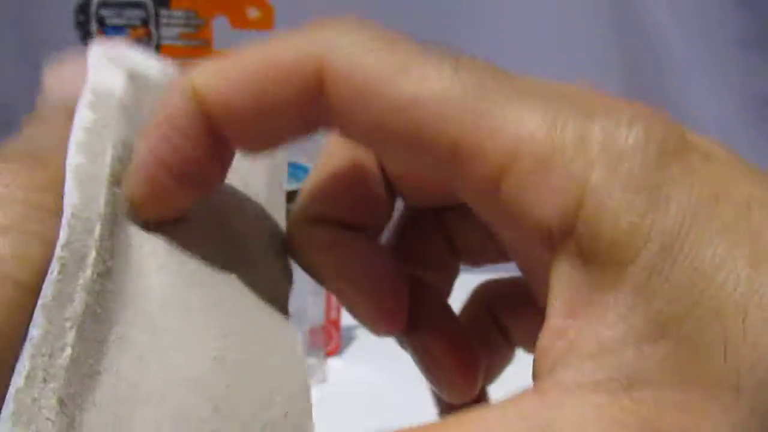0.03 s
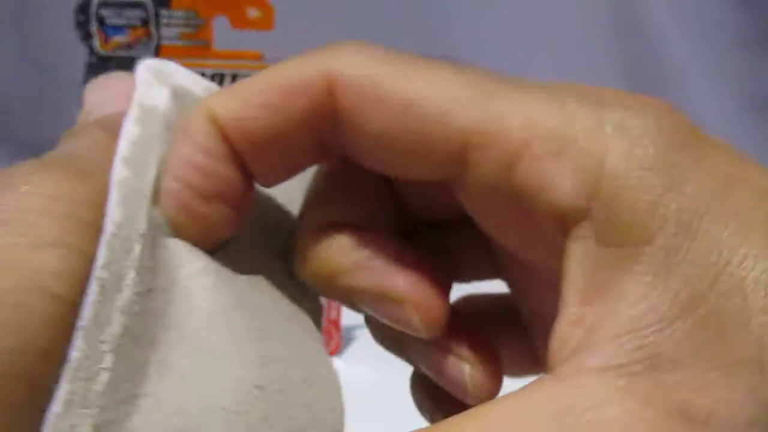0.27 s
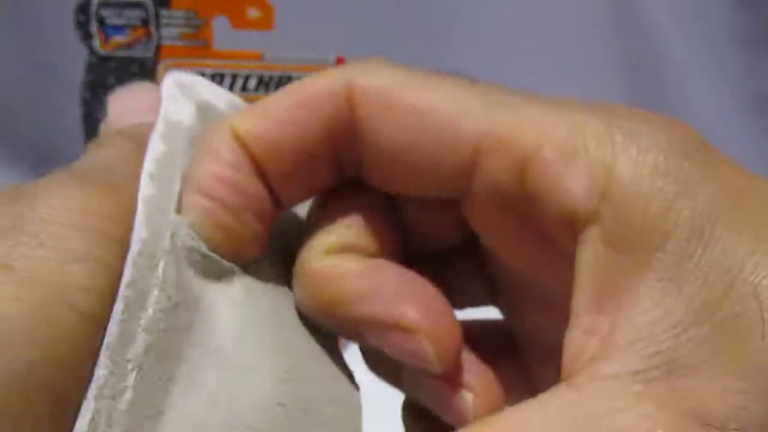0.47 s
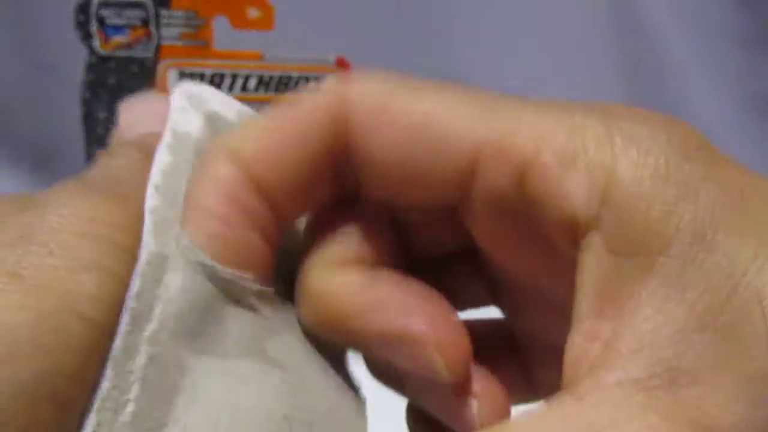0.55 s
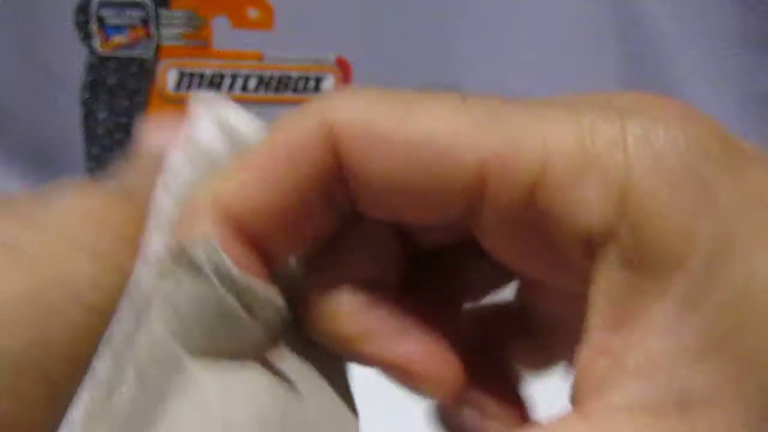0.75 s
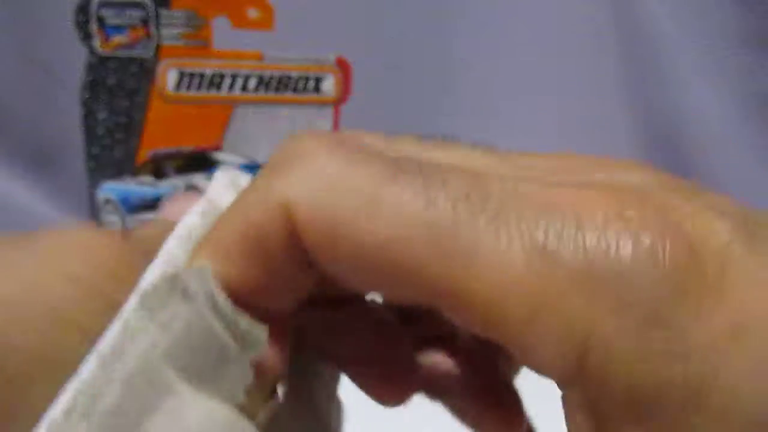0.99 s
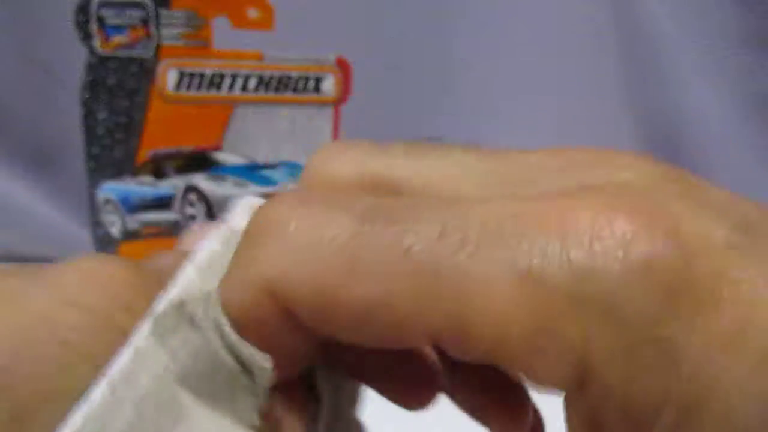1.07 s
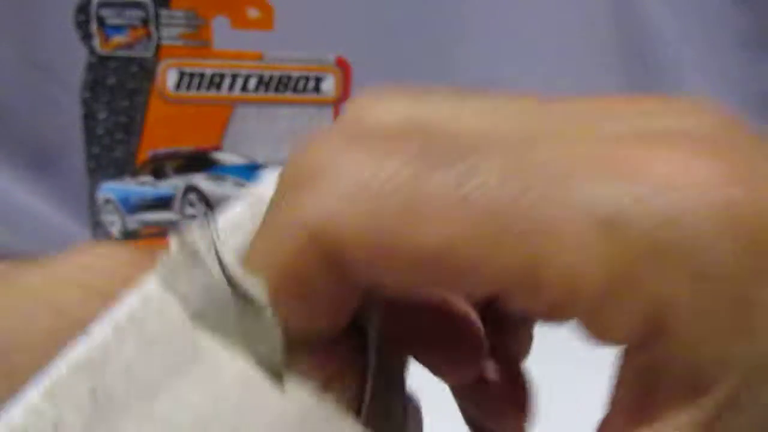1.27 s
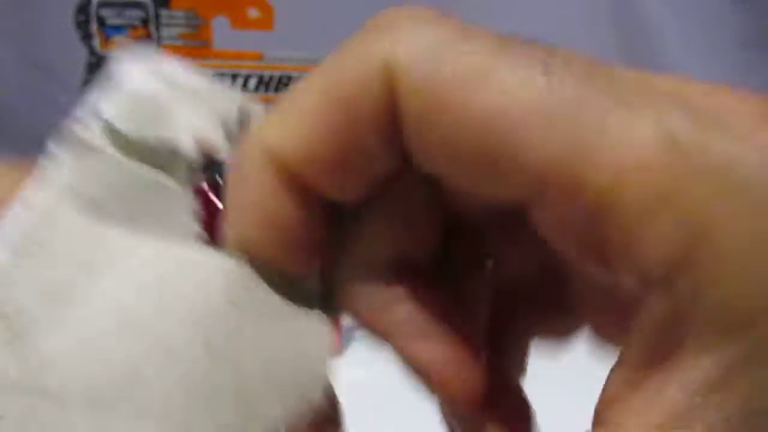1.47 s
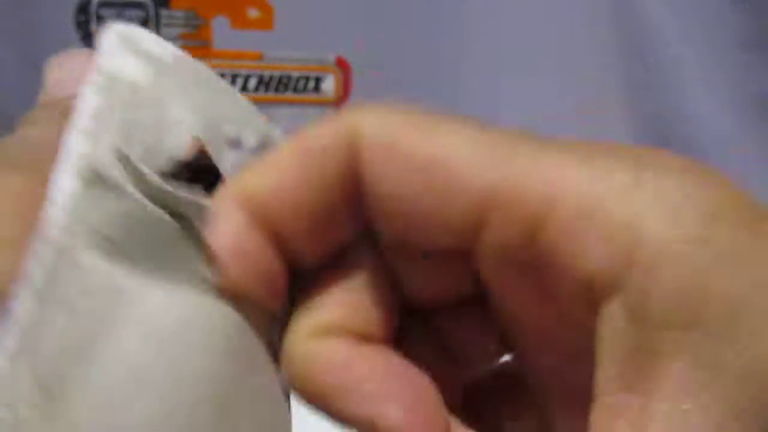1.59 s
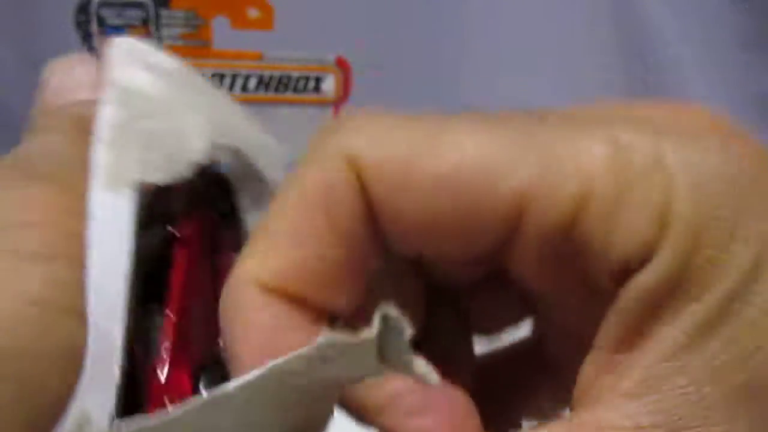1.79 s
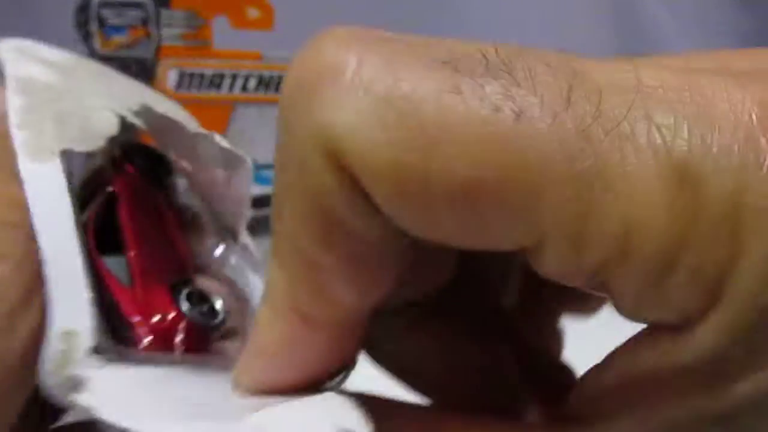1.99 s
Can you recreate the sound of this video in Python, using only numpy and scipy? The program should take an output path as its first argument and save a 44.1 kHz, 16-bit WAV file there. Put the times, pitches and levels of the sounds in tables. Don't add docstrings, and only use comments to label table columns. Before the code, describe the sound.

Cardboard tears from a stiff plastic toy pack, very close in a quiet, faintly hissing room. Soft crackling and snaps open, with brisker ripping from 0.2 s and hard cracks near 0.58 s. Scattered cracks follow around 0.83 s, tiny nail slips at 1.2 s, sharp snaps at 1.35 s. The densest, loudest rip comes at 1.7-1.8 s with dull knocks, then faint crackles and a last creak.

```python
import sys
import numpy as np
from scipy import signal
from scipy.fft import rfft, irfft, next_fast_len
from scipy.io import wavfile
from scipy.ndimage import uniform_filter1d, map_coordinates

SR = 44100
rng = np.random.default_rng(int(sys.argv[2]) if len(sys.argv) > 2 else 0)


def int16_out(signal):
    q = np.round(np.clip(np.atleast_2d(signal).T, -1, 1) * 32767)
    wavfile.write(sys.argv[1], SR, q.astype(np.int16))


def to_linear_factor(level_db):
    exponent = np.asarray(level_db, float) / 20
    return 10 ** exponent


N = 90404

# (start [s], end [s], level [dB], card over rasp [dB], fizz over rasp [dB])
STROKES = [(0, 0.069, -49.5, 3, 0.5), (0.064, 0.088, -45, 0.5, 0), (0.101, 0.18, -51, 2, -16),
           (0.191, 0.234, -38, -1, -0.5), (0.246, 0.354, -36, -9.5, 0.5), (0.333, 0.438, -38.5, -9, 6.5),
           (0.442, 0.56, -44, 2.5, 3), (0.574, 0.646, -43, -2, 3), (0.753, 0.796, -46, 2.5, 1.5),
           (0.803, .845, -36.5, -3.5, -0.5), (0.857, 0.954, -42, 0, 2.5), (0.959, 1.104, -45.5, 2.5, 2),
           (1.04, 1.184, -43, 1, 0.5), (1.19, 1.325, -48, 1.5, -1.5), (1.334, 1.38, -34.5, -0.5, 1),
           (1.295, 1.322, -42.5, 0.5, -0.5), (1.38, 1.47, -49, 3.5, -1), (1.484, 1.56, -37.5, -1.5, 3),
           (1.532, 1.651, -38, 0.5, -3), (1.664, 1.796, -35.5, -0.5, 4.5), (1.78, 1.892, -56, 0, 7),
           (1.901, 1.958, -47, -4.5, 8.5), (1.963, 2.053, -67.5, 11, 0)]
# (time [s], length [s], level [dB], card over rasp [dB], fizz over rasp [dB])
RIPS = [(.158, 0.0037, -34.5, 8, -9), (.175, 0.014, -47.5, 13, -8), (.2385, 0.0096, -42, 9, -8),
        (.364, 0.0043, -34, 2.5, -14), (.373, 0.0087, -38.5, 7.5, -11), (.396, 0.009, -36.5, 3.5, 6),
        (.539, 0.0031, -30.5, 0.5, 7), (.558, 0.0036, -31.5, 1.5, 10), (.565, 0.008, -26, -2, 5.5),
        (.574, 0.0068, -32.5, -1, 1), (.584, 0.0081, -24, 4, 6), (.590, 0.0065, -22, -1, 4.5),
        (.822, 0.0078, -28, -4.5, -2), (.836, 0.0072, -31.5, 1.5, -15), (.868, 0.0092, -30, 0.5, -1),
        (1.087, 0.011, -27, 7, 6.5), (1.336, 0.0085, -36, 6, 3), (1.364, 0.0023, -35, -11, 7.5),
        (1.546, 0.012, -34, 6, -20), (1.597, 0.006, -27.5, -1, -12), (1.671, 0.0098, -32, -12, 3.5),
        (1.7765, 0.009, -19, 0, 2.5), (1.941, 0.01, -41, 2, 5.5), (1.981, 0.0051, -40.5, 0, -2.5)]
# (time [s], level [dB], card over rasp [dB], fizz over rasp [dB])
SNAPS = [(0.1035, -31, 8.5, -6), (0.114, -26.5, -12, -0.5), (0.127, -29.5, -12, 1.5),
         (0.138, -28.5, -12, -1), (0.181, -39.5, -11, 13.5), (.472, -33.5, -11, 7.5),
         (0.5916, -15.5, 7.5, -2), (.624, -30.5, -2.5, -5), (0.687, -29.5, -2.5, -1.5),
         (0.702, -28, -2, -6), (.716, -30.5, 2, -8), (1.116, -34, 9, 7), (1.137, -34.5, 4, 13.5),
         (1.152, -32, -3, 10), (1.162, -35, -9, 14), (1.206, -43, -14, 14.5), (1.247, -41, -13, 14.5),
         (1.338, -23.5, 4, -3), (1.4, -28, 0, 2), (1.48, -39, -10, -4),  (1.809, -20, -8.5, -0.5),
         (1.7482, -12, -3, 4)]
# (start [s], end [s], slip rate [1/s], level [dB])
CREAKS = [
    (1.997, 2.052, 100, -44),
]
# (time [s], peak level [dB], card over rasp [dB], fizz over rasp [dB])
CRACKS = [(.188, -27, -8, 0), (0.2387, -14.5, 0.5, -10), (.2452, -26, -8, -2), (0.371, -17, -15, 3),
          (.456, -28, -7, 3), (.481, -21, 4, -2), (.505, -26, -10, 5), (.538, -16, -1, 6),
          (.57, -10, -3, 4), (.585, -5, 4, 0), (0.694, -28, 5, -1), (.709, -30.5, 8.5, -10),
          (0.7474, -22, -4, 2), (0.796, -19.5, -2, 6.5), (0.8089, -16.5, -9, 9), (.814, -20, 1, -2),
          (0.823, -22, -3, -3), (0.8288, -9, -11, 3.5), (.836, -17.5, 4, -8), (0.8411, -13, -2, -6),
          (0.8684, -10.5, 4.5, -9), (.974, -26, 2, -4), (1.0128, -20, 1, -6), (1.046, -23, 2, -3),
          (1.056, -17, 4, -3), (1.133, -24, 5, 4), (1.168, -26, -4, 9), (1.273, -27, -2, 9),
          (1.315, -19, -4, 5), (1.3365, -8, -3, 6), (1.3656, -6.5, 1.5, 0), (1.386, -16, 2, 3),
          (1.52, -15.5, 6, -3), (1.5972, -14, -3, -2), (1.649, -24, -9, 3), (1.6718, -17, 1, 5),
          (1.678, -14, -2, 4), (1.705, -16, -11, 11), (1.7195, -16, -7, 10), (1.724, -13, -6, 7),
          (1.731, -11.5, 3.5, 6), (1.7474, -1, 1, 6), (1.756, -12, -4, 1), (1.7612, -9.5, 3, 5),
          (1.778, -6, 5.5, 0), (1.781, -5, 0, -8), (1.8672, -36, -8, 0), (1.8843, -33, -2, 0),
          (1.9061, -33.5, 2, 0), (1.9238, -33, -3, 2)]
# (time [s], peak level [dB])
NAIL_SLIPS = [(1.177, -36), (1.183, -39), (1.192, -28.5), (1.2, -34), (1.207, -28), (1.2132, -31),
              (1.22, -27), (1.2295, -33), (1.236, -26), (1.2427, -27), (1.25, -29), (1.256, -27.5),
              (1.261, -27.5), (1.267, -26), (1.281, -26.5), (1.295, -33), (1.302, -33), (1.41, -26),
              (1.415, -33), (1.424, -28), (1.428, -37)]
# (time [s], length [s], level [dB])
PEELS = [
    (0.244, 0.113, -37.5),
    (0.365, 0.0022, -18.5),
    (0.9, 0.045, -43),
    (1.473, 0.045, -45),
]
# (time [s], level [dB], pitch [Hz])
JOLTS = [(0.076, -41.5, 107), (.16, -36, 318), (0.186, -31, 376), (.235, -31.5, 493), (0.586, -28, 107),
         (.59, -31.5, 203), (0.84, -25, 2640), (1.09, -39.5, 74), (1.091, -30, 1270), (1.747, -32.5, 300),
         (1.781, -25.5, 147), (1.78, -34, 60)]

# (centre [Hz], width [Hz], level [dB])
RASP = [(2230, 210, -14), (3477, 1300, 7), (5130, 3400, -6)]
CARD = [(355, 417, -11), (435, 250, -6), (791, 279, -3.5), (1252, 353, -1), (1936, 526, -4)]
FIZZ = [(6650, 2410, -1), (9020, 5760, 0), (12640, 5140, -3)]
FILM = [(12100, 770, -5), (13900, 1000, 4), (15100, 1100, -3)]

# (frequency [Hz], level per Hz [dB])
ROOM_TONE = [(20, -7), (60, 0), (150, -1), (400, -9.5), (1500, -7.5), (4000, -11.5), (6000, -16.5),
             (16000, -14.5)]
# (frequency [Hz], phase lead [rad])
LEFT_LEAD = [(0, -4), (2150, 0.78), (5770, 1.5), (8530, 2), (9560, 1.4), (12100, 3.5), (16000, 2)]
# (frequency [Hz], left over right [dB])
LEFT_LEAN = [(60, -19), (150, 1.5), (380, 0.5), (950, -0.5), (2380, -1), (5980, 0), (15000, 8.5)]
# (frequency [Hz], phase spread [rad])
LEAD_SCATTER = [(100, 0.27), (700, 0.4), (1500, 0.28), (3000, 1.15), (8000, 1.7)]

RISE_S, FALL_S = .0014, .0013


def unit(x):
    return x / np.sqrt(np.mean(x ** 2) + 1e-20)


def along(points, hz):
    f, value = np.transpose(points)
    return np.interp(np.log(hz + 1), np.log(f + 1), value)


def wobble(rate):
    knots = rng.standard_normal(int(N * rate / SR) + 4)
    return map_coordinates(knots, [np.arange(N) * rate / SR])


def filtered(x, response):
    m = next_fast_len(N + 8192)
    return irfft(rfft(x, m) * response(np.fft.rfftfreq(m, 1 / SR)), m)[..., :N]


def body(x, peaks):
    def resonances(f):
        total = 0
        for k, (centre, width, db) in enumerate(peaks):
            damping = 1j * f * width
            total = total + (-1) ** k * to_linear_factor(db) * damping / (centre ** 2 - f ** 2 + damping)
        return total / np.sqrt(np.mean(abs(total) ** 2))

    return filtered(x, resonances)


def swell(s, length, rise, fall):
    t = np.arange(N) / SR - s
    return np.exp(np.minimum(t, 0) / rise - np.maximum(t - length, 0) / fall)


def drive(rows, rise, fall):
    power = 0
    for s, length, db, card, fizz in rows:
        levels = to_linear_factor([db, db + card, db + fizz])
        power = power + np.outer(levels, swell(s, length, rise, fall)) ** 2
    return np.sqrt(power)


def room_tone():
    hiss = rng.standard_normal((2, N))
    return to_linear_factor(-50.5) * unit(filtered(hiss, lambda f: to_linear_factor(along(ROOM_TONE, f))))


def fibres():
    breaks_per_s, spread_db, rustle_db = 1500, 3.2, -2
    chance, luck, side = rng.random((3, N))
    size = to_linear_factor(-spread_db * np.log(luck + .025))
    breaks = (chance < breaks_per_s / SR) * size * np.sign(side - .5)
    return unit(unit(breaks) + to_linear_factor(rustle_db) * rng.standard_normal(N))


def tearing():
    ease_s, flutter_db, stutter_db, rip_crest = .005, 1.2, 1.5, 2.2
    pulls = [(start, end - start, *levels) for start, end, *levels in STROKES]
    flutter = to_linear_factor(flutter_db * np.array([wobble(61.28), wobble(60.12), wobble(59.14)]))
    strokes = drive(pulls, 2 * ease_s, ease_s) * flutter * fibres()
    even_breaks = np.clip(fibres(), -rip_crest, rip_crest)
    stutter = unit(to_linear_factor(stutter_db * wobble(350)) * even_breaks)
    return strokes + drive(RIPS, RISE_S, FALL_S) * stutter


def patches(shape):
    field = uniform_filter1d(rng.standard_normal(shape), size=3, axis=0)
    return unit(uniform_filter1d(field, size=22, axis=1))


def wandering_sides(x):
    hz, _, z = signal.stft(x, SR, nperseg=256)
    z = z * to_linear_factor(1.3 * patches(z.shape))
    scatter = along(LEAD_SCATTER, hz)[:, None] * patches(z.shape)
    half_lead = (along(LEFT_LEAD, hz)[:, None] + scatter) / 2
    half_lean = to_linear_factor(along(LEFT_LEAN, hz)[:, None] / 2)
    left = z * half_lean * np.exp(1j * half_lead)
    right = z / half_lean * np.exp(-1j * half_lead)
    return signal.istft(np.array([left, right]), SR, nperseg=256)[1][:, :N]


def table(x):
    t60, first_bounce_s = .05, .002
    t = np.arange(SR // 10) / SR
    tail = rng.standard_normal((2, len(t))) * to_linear_factor(-60 * t / t60) * (t > first_bounce_s)
    return to_linear_factor(-16) * signal.fftconvolve(x, tail / np.linalg.norm(tail[0]), axes=1)[:, :N]


def jolts():
    longest_t60, ring_cycles, onset_s = 0.057, 45, 0.0014
    t = np.arange(N) / SR
    out = np.zeros(N)
    for s, db, hz in JOLTS:
        age = np.maximum(t - s, 0)
        t60 = min(longest_t60, ring_cycles / hz)
        fade = to_linear_factor(db - 60 * age / t60) * (1 - np.exp(-age / onset_s))
        out += fade * np.sin(2 * np.pi * hz * age)
    return out * to_linear_factor([[-.7], [.7]])


def snapping():
    snap_s, card_db, fizz_db = .0007, 4, -10
    events = list(SNAPS)
    for start, end, rate, db in CREAKS:
        for s in np.arange(start, end, 1 / rate):
            uneven_s = s + rng.normal(0, 0.138) / rate
            events.append((uneven_s, db + rng.normal(0, 0.99), card_db, fizz_db))
    rows = [(s, 0, *levels) for s, *levels in events]
    return drive(rows, snap_s / 10, snap_s) * np.sign(rng.standard_normal(N))


def cracking():
    after_s, after_db = .001, -10
    slips = [(s, db + 4.5, 6, -10) for s, db in NAIL_SLIPS]
    time, rasp, card, fizz = np.array(CRACKS + slips).T
    draw = rng.random((len(time), 8))
    late = draw[:, :4] * [0, 1, 1, 1]
    at = np.round((time[:, None] + after_s * late) * SR).astype(int)
    size = np.sign(draw[:, 4:] - .5) * to_linear_factor(after_db * (late + (late > 0)))
    out = np.zeros((3, N))
    for k, db in enumerate([rasp, rasp + card, rasp + fizz]):
        clicks = size * to_linear_factor(db)[:, None]
        out[k] = np.bincount(at.ravel(), clicks.ravel(), N)
    return out


def peeling():
    lift = sum(to_linear_factor(db) * swell(s, length, RISE_S, FALL_S) for s, length, db in PEELS)
    return body(lift * fibres(), FILM)


def scene():
    rasp, card, fizz = tearing() + snapping() + cracking()
    materials = body(rasp, RASP) + body(card, CARD) + body(fizz, FIZZ)
    pack = wandering_sides(materials + peeling())
    return pack + table(pack) + jolts() + room_tone()


def band_limit(x):
    return signal.sosfilt(signal.butter(12, 16490, fs=SR, output="sos"), x)


def record(dry):
    notch_hz, notch_wide_hz, notch_depth, top_hz = 7900, 110, .75, 15900

    def microphone(f):
        notch = 1 - notch_depth * np.exp(-((f - notch_hz) / notch_wide_hz) ** 2)
        return notch * (f < top_hz)

    mix = np.clip(filtered(dry, microphone), -1, 1)
    return band_limit(mix)


dry = scene()
out = record(dry)
int16_out(out)
```